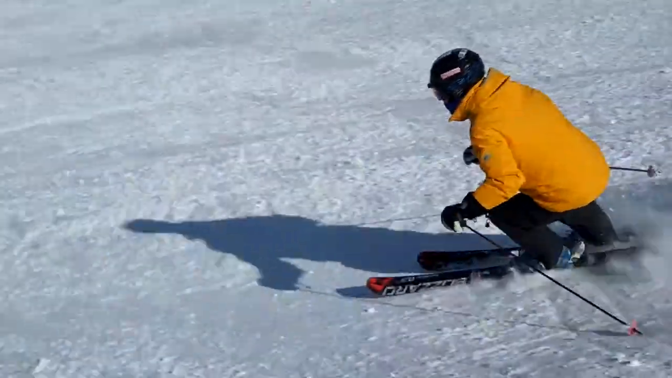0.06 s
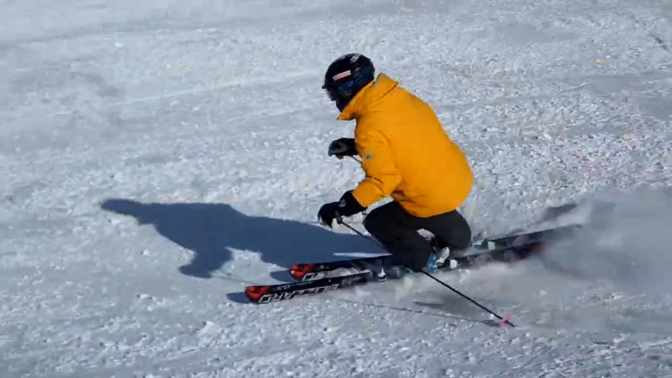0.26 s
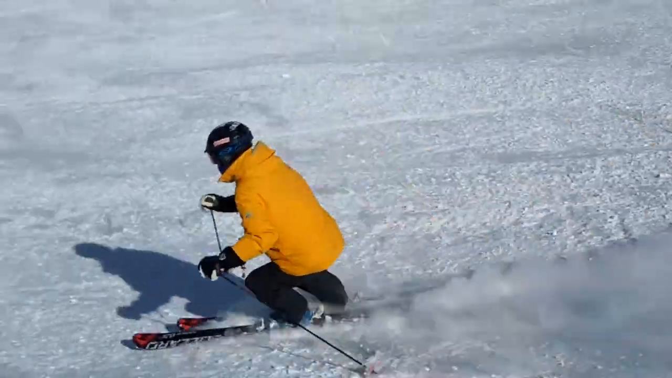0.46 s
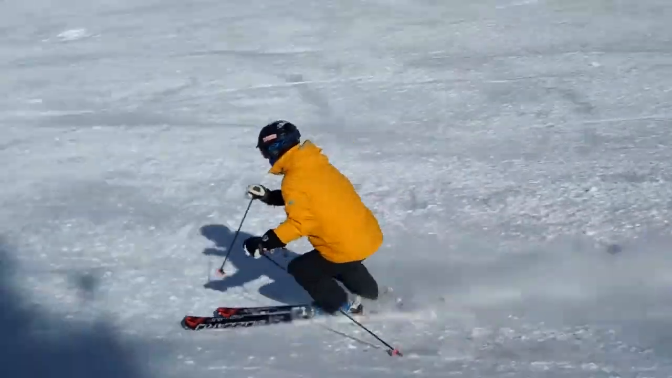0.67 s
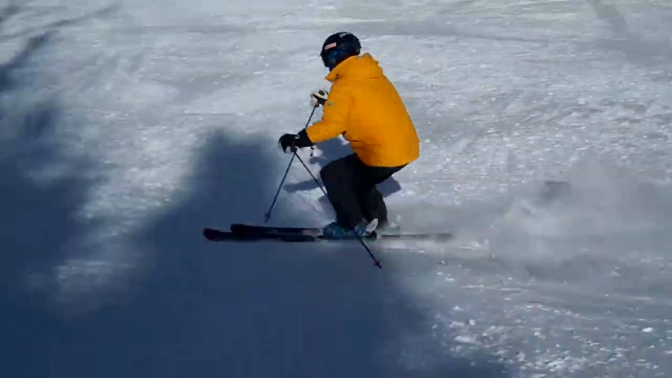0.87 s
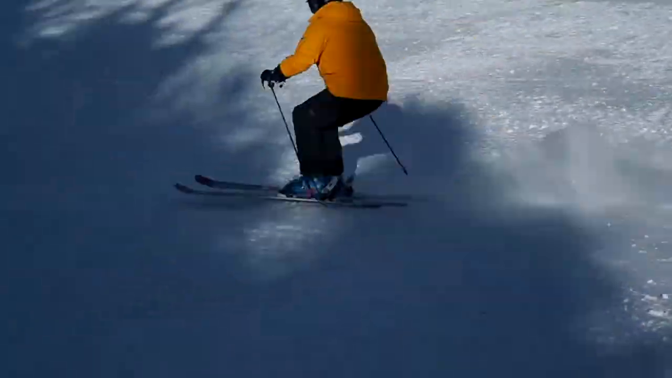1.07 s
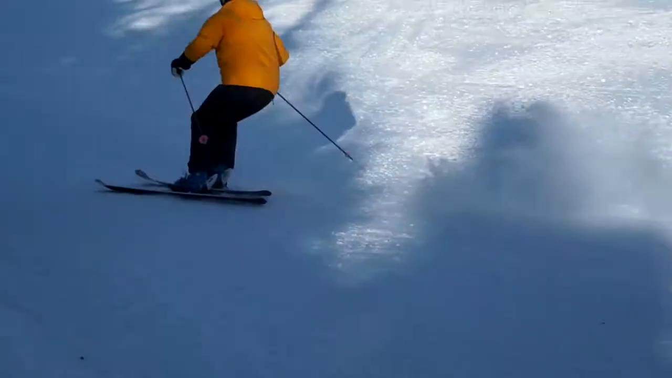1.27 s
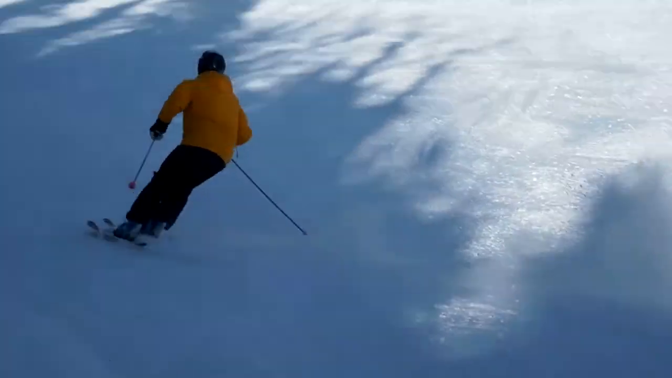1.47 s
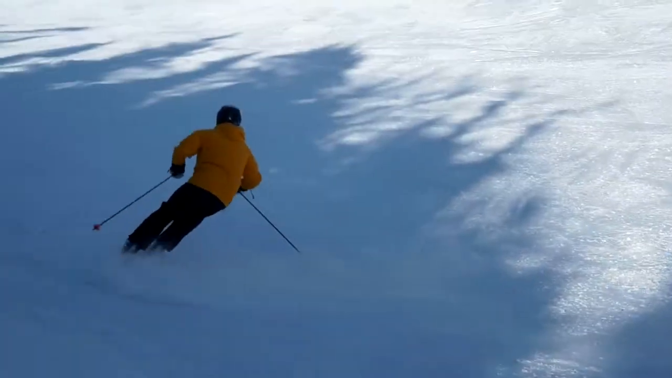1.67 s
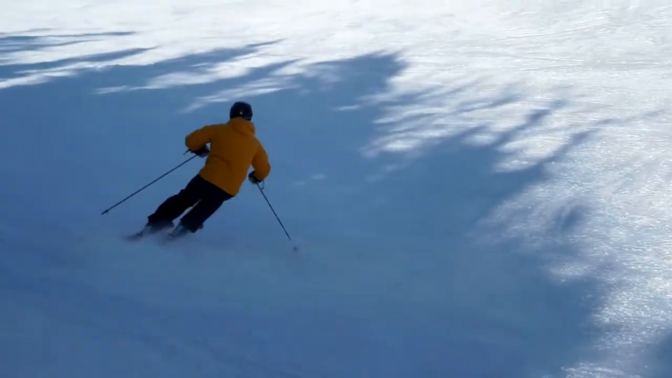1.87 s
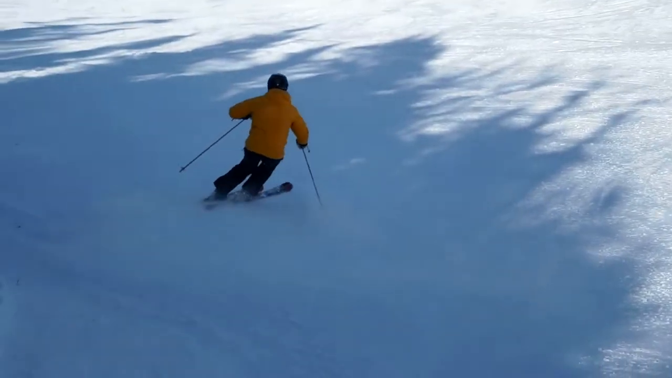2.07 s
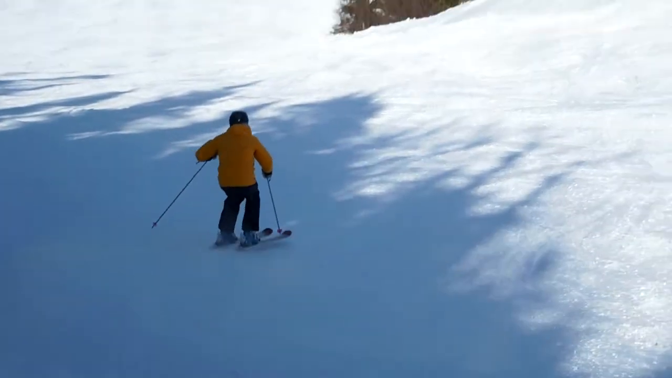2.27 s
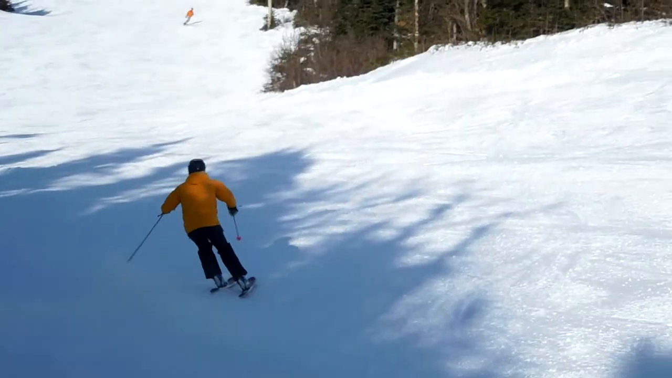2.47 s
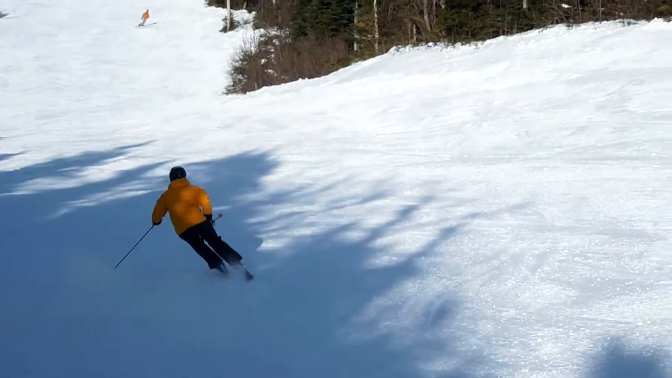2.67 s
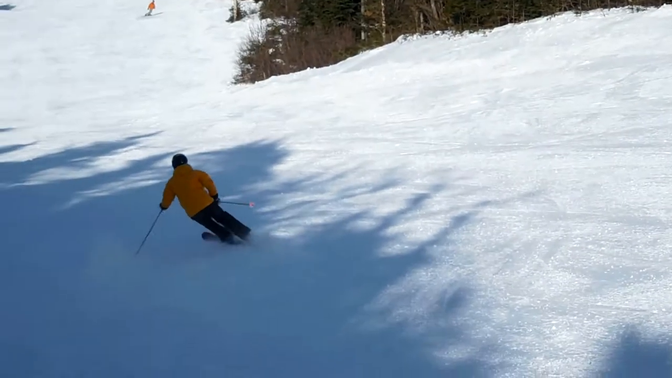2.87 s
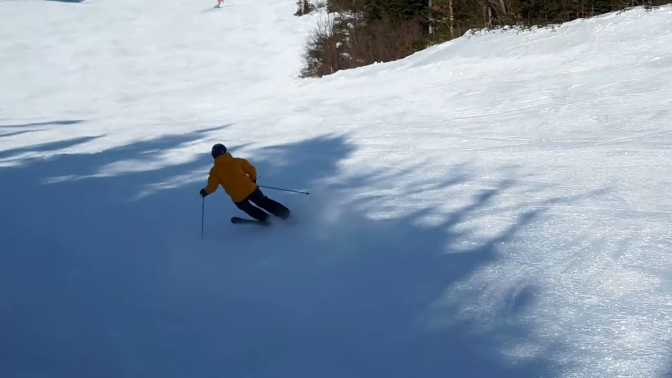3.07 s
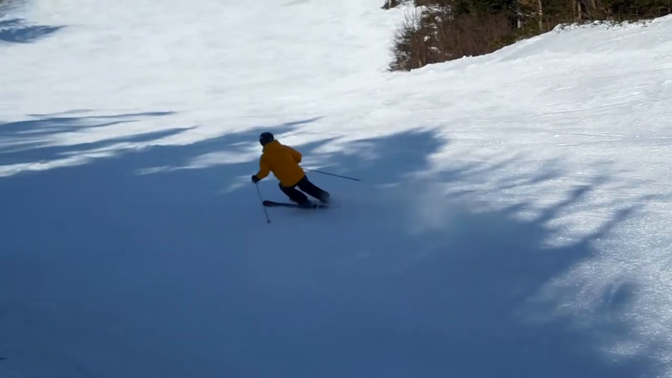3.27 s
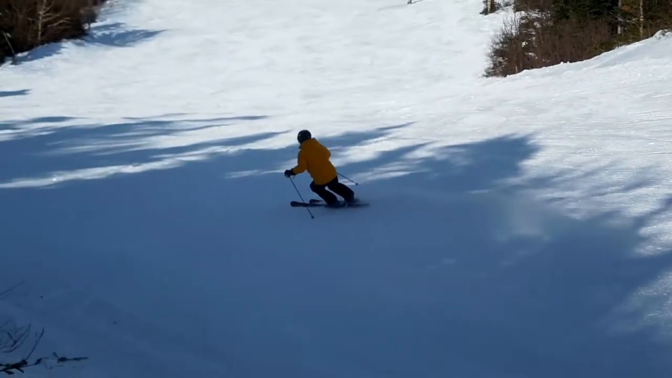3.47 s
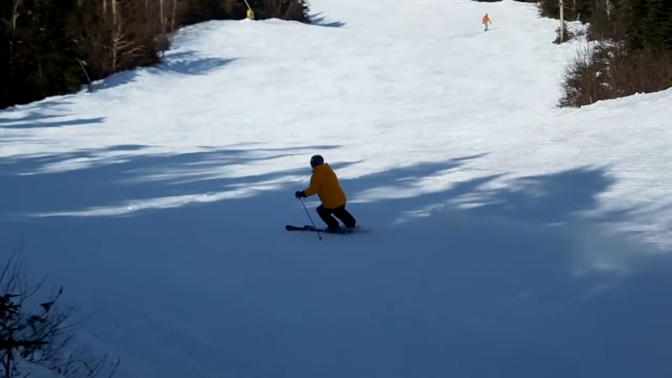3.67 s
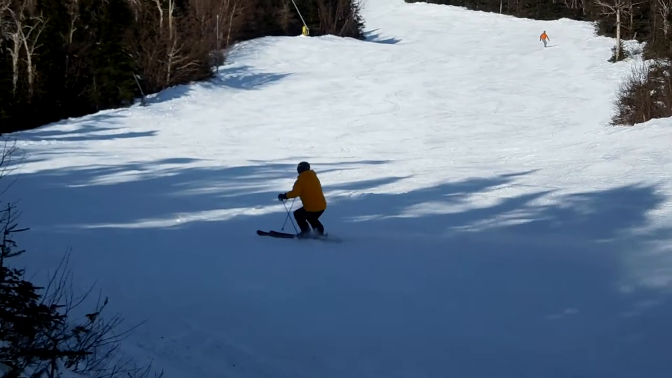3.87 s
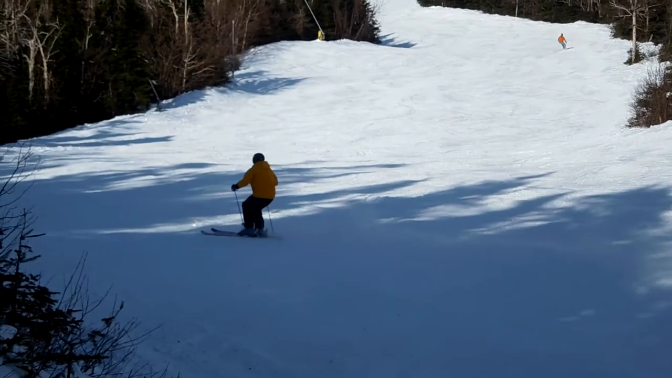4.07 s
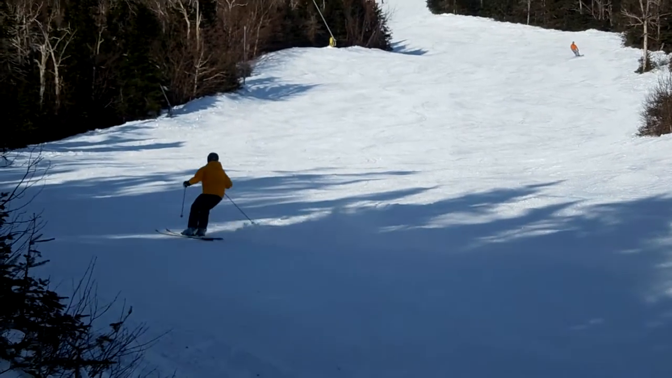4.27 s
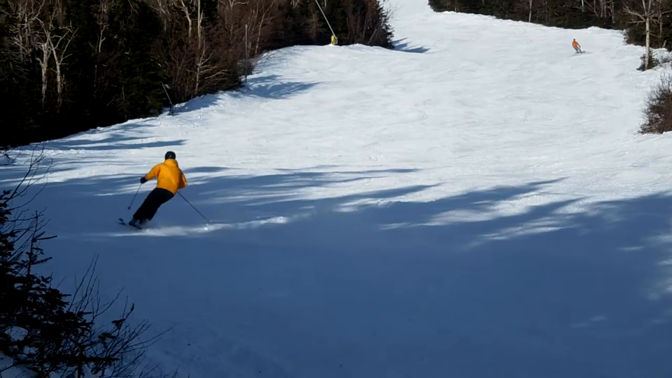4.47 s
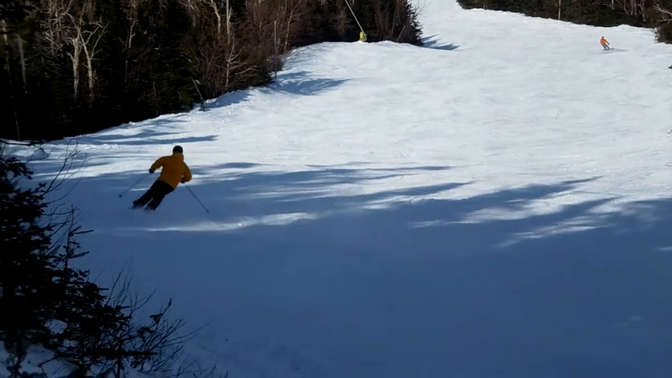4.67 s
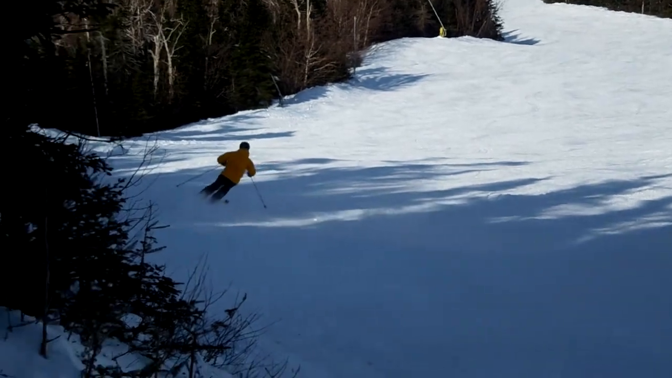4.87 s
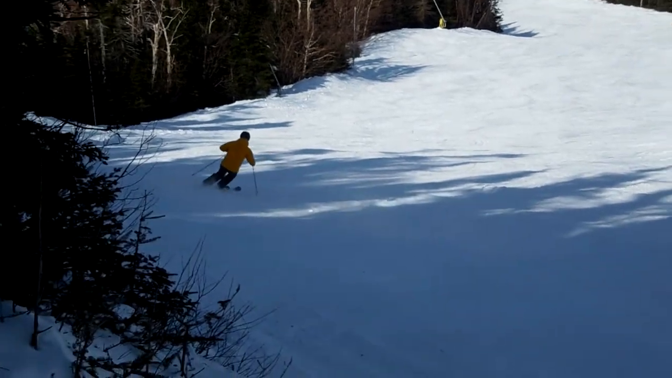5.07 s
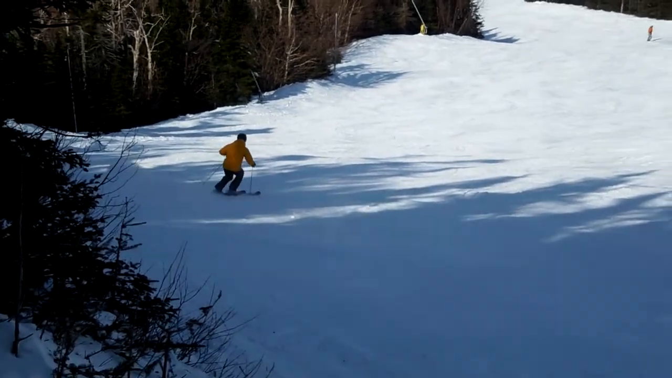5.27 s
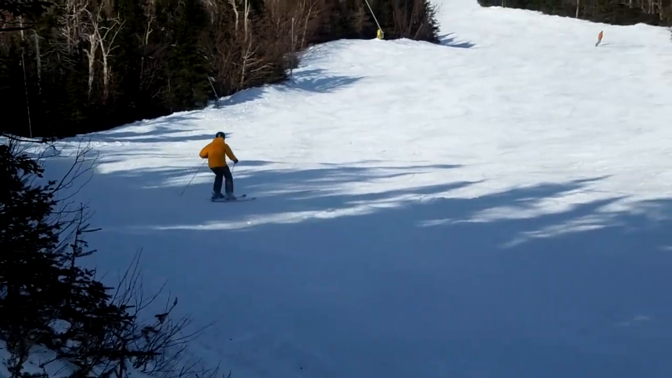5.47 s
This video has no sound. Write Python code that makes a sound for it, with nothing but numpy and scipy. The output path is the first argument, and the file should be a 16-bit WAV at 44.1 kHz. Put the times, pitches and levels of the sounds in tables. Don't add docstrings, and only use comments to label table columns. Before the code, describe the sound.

Outdoors on hard groomed snow, heard through a small stereo camera microphone. From 0 to 1 second skis pass close: a loud, bright, grainy hiss with a rougher scrape and low shudder beneath. Sharp crust snaps and knocks cluster at 0.16-0.5, strongest near 0.19, while low wind puffs bump the microphone, some to one side. A hard flat slap with a short knock hits at 0.71. The hiss drops steeply from 1 to 1.4 as the skier heads off. A softer, duller carve swells around 1.5-2.4, with a knock at 1.57 and faint squeaks at 1.9 and 2.3. It dips near 2.6, swells again around 2.8-3.1 with another squeak, then scrapes and taps lightly at 3.3-3.8. It sinks near 4.3, then weak swishes return around 4.6 and 5.2-5.5, with soft wind pushes, faint drone and electronic hiss.

```python
import sys
import numpy as np
from scipy import signal
from scipy.fft import rfft, irfft, next_fast_len
from scipy.io import wavfile
from scipy.ndimage import uniform_filter1d

SR = 44100
rng = np.random.default_rng(int(sys.argv[2]) if len(sys.argv) > 2 else 0)


def int16_out(signal):
    q = np.round(np.clip(np.atleast_2d(signal).T, -1, 1) * 32767)
    wavfile.write(sys.argv[1], SR, q.astype(np.int16))


def voltage_ratio(level):
    return 10 ** (np.asarray(level, float) / 20)


N = 243167
FAST = next_fast_len(N)


def evened(x):
    return x / np.sqrt(np.mean(abs(x) ** 2) + 1e-20)


def read(points, hz):
    f, value = np.transpose(points)
    return np.interp(np.log(hz + 1), np.log(f + 1), value)


def control(table, column, step=1):
    rows = np.array(table)
    return np.interp(np.arange(N // step + 5) * step / SR, rows[:, 0], rows[:, column])


def add(mix, s, sound):
    part = mix[round(s * SR):][:len(sound)]
    part += sound[:len(part)]


def swells(rows):
    t = np.arange(N) / SR
    return sum(height * np.exp(-((t - s) / max(half, .005)) ** 2) for s, height, half in rows)


def coloured(x, points):
    gain = voltage_ratio(read(points, np.fft.rfftfreq(FAST, 1 / SR)))
    return evened(irfft(rfft(x, FAST) * gain, FAST)[..., :N])


def wander(lo_hz, hi_hz):
    return coloured(rng.standard_normal(N), [(lo_hz / 2, -40), (lo_hz, 0), (hi_hz, -6), (2 * hi_hz, -40)])


# resonance in Hz, sharpness (Q).
PORTS = [(9170, 4.3), (7756, 6.55)]


def ports(hz):
    f, sharp = np.transpose(PORTS)[:, :, None]
    return 1 / (1 - (hz / f) ** 2 + 1j * hz / f / sharp)


# time in seconds, load on the edge in dB, bite into the crust in dB.
CARVE = [(0, -23, -11.5), (.38, -24, -14.5), (.5, -19, -15), (.72, -19, -13.5), (.83, -24.5, -13),
         (1.03, -26, -16.5), (1.28, -39, -10.5), (1.38, -41, -8.5), (1.45, -35, -10), (2.36, -31.5, -2),
         (2.58, -46.5, -4.5), (3.05, -29, -8), (3.33, -40, 0), (4.05, -37, -10), (4.35, -51, -3.5),
         (4.61, -39.5, -8.5), (4.84, -47.5, -3.5), (5.51, -39.5, -1.5)]
# time in seconds, change in dB, half length in seconds.
BUMPS = [(.19, 4.5, 0.068), (.29, 2.5, 0.023), (.35, 3.5, .015), (.4, 4.5, 0.0081), (.62, 0.5, .04),
         (.93, -0.5, .05), (1.14, 0.5, 0.088), (1.24, -1, 0.035), (1.6, 2.5, 0.07), (1.75, -1.5, 0.064),
         (1.92, 2.5, 0.15), (2.06, -1, 0.093), (2.34, 1, .04), (2.43, -1.5, 0.056), (2.5, 0.5, .03),
         (2.68, -1, 0.046), (2.82, 2.5, 0.15), (2.9, -4, 0.048), (3.18, 0.5, .04), (3.32, -1, 0.046),
         (3.42, 3, 0.087), (3.67, -0.5, .05), (3.75, 2, 0.044), (4.13, 0, 0.03), (5.2, 1, 0.084)]


def edge_levels():
    load_db, jolt_db = control(CARVE, column=1)[:N], swells(BUMPS)
    bite_db = load_db + control(CARVE, column=2)[:N] + 1.04 * jolt_db
    shake_db = 0.36 * (load_db + jolt_db + 34)
    return load_db + jolt_db, bite_db, shake_db


def grit(per_s, spread_db):
    size = voltage_ratio(spread_db * np.minimum(rng.exponential(1, N), 5)) * rng.choice([-1., 1.], N)
    return evened(size * (rng.random(N) < per_s / SR))


# time in seconds, distance in metres, delay in ms and strength (0-1) of the echo
# off the camera hand, lateness of the right port in microseconds.
PATH = [
    (0, 6.7, 0.73, 0.024, -17),
    (.75, 6.5, 0.42, 0.023, 1),
    (1.2, 15.4, 0.89, 0.11, -27),
    (1.9, 14.7, .6, 0.11, 11),
    (2.45, 16, .645, .26, -1),
    (2.8, 24, .645, 0.12, 2),
    (3.7, 21, .66, 0.12, -2),
    (4.3, 35, .62, 0.48, -12),
    (5.52, 17, 0.49, 0.55, 0),
]
# time in seconds, shudder level from rough snow in dB, then how hard the edge,
# the tip and the body of the ski ring, each in dB.
SKIS = [(0, -36, -3.5, -5, -2), (.31, -44.5, 1, -1, -3.5), (.62, -39.5, 0.5, -4, 4.5),
        (.87, -40, 0.5, -7, 6), (1.05, -48, 2, -1, 5.5), (1.45, -42, 4, -3.5, -0.5),
        (1.9, -47, -0.5, -0.5, 2), (2.1, -49.5, -1.5, 2, 6.5), (2.33, -46.5, 0.5, 0, 8.5),
        (3.05, -46, -0.5, 2, 3.5), (3.42, -39, 3.5, 2.5, 6.5), (3.95, -42, 0.5, 5.5, 8),
        (4.25, -45.5, 2, -1.5, 4.5), (4.9, -44, 2.5, -8, 1), (5.15, -44.5, 4.5, -1, 4.5),
        (5.52, -46.5, 5.5, 3, 6)]
# ring frequency in Hz, width in Hz.
RINGS = [
    (1900, 1650),
    (740, 150),
    (269, 72),
]


def snow(level_db, near, distant, bump, per_s, spread_db, patchy_db, chatter_db, diffuse, size):
    hop = size // 4
    grains = np.array([grit(per_s, spread_db) for _ in range(3)])
    hz, _, z = signal.stft(grains, SR, nperseg=size, noverlap=size - hop)
    cavity = ports(hz)[:, :, None]
    hz = hz[:, None]
    metres, lag_ms, echo, late_us = (control(PATH, c, step=hop)[:z.shape[2]] for c in range(1, 5))
    ring_db = [control(SKIS, c, step=hop)[:z.shape[2]] for c in range(2, 5)]

    by_pitch = 0.018 + hz ** 4 / (hz ** 4 + 2400 ** 4) + (hz / 17000) ** 3
    scattered = np.clip(diffuse * (0.64 + metres / 45) * by_pitch, 0, .98)

    lag = hz * lag_ms / 1000 * np.array([1, 1.12])[:, None, None]
    strength = echo / (1 + (hz / 7000) ** 2) * np.array([1, .4])[:, None, None]
    comb = 1 + np.exp(-2j * np.pi * (lag - .21)) * strength
    comb[1] *= np.exp(-2j * np.pi * hz * late_us / 10 ** 6)

    far = np.clip((metres - 5) / 12, 0, 1)
    air_db = 0.0014 * metres * (hz / 1000) ** 2
    shape_db = (1 - far) * read(near, hz) + far * read(distant, hz) - air_db
    for db, (f, width) in zip(ring_db, RINGS):
        shape_db = shape_db + db * np.exp(-((hz - f) / width) ** 2)
    shape = voltage_ratio(shape_db)
    shape = shape / np.sqrt(np.mean(abs(shape * comb * cavity) ** 2, (0, 1)))

    patches = rng.standard_normal(z.shape[1:])
    patches = evened(uniform_filter1d(uniform_filter1d(patches, 3, 0), 24, 1))
    direct = np.sqrt(1 - scattered ** 2) * z[0] * comb
    z = (direct + scattered * z[1:]) * shape * voltage_ratio(patchy_db * patches)
    sound = signal.istft(z, nperseg=size, noverlap=size - hop)[1][:, :N]
    return sound * voltage_ratio(level_db[:N] + chatter_db * bump)


# frequency in Hz, density in dB per Hz.
SPRAY_NEAR = [(2500, -20), (4200, -4), (5500, -4), (6200, -3.5), (6750, -1.5), (7250, 2), (7750, -5),
              (8400, -2), (9400, -2), (10500, 0), (12000, -3.5), (14000, 2), (15700, -4)]
SPRAY_FAR = [(2500, -17.5), (4200, -9), (5500, -6.5), (6800, -8), (7700, -8.5), (10000, -8.5),
             (11000, -8.5), (12500, -8.5), (15500, -26)]


def spray(level_db, bump):
    return snow(level_db, SPRAY_NEAR, SPRAY_FAR, bump, per_s=14000, spread_db=2.5,
                patchy_db=1.5, chatter_db=0.68, diffuse=0.51, size=256)


# frequency in Hz, density in dB per Hz.
SCRAPE = [(700, -10), (1150, -5), (1500, -2.5), (2050, -2), (2600, -2.5), (3150, -2), (3900, -4),
          (4700, -10), (6500, -14), (9000, -54)]


def scrape(level_db, bump):
    return snow(level_db, SCRAPE, SCRAPE, bump, per_s=7000, spread_db=2.0,
                patchy_db=1.5, chatter_db=0.9, diffuse=0.8, size=256)


# frequency in Hz, density in dB per Hz.
SHUDDER_NEAR = [(70, -23), (130, 2), (260, -2), (450, -3), (700, -1), (1000, -13.5), (1900, -36)]
SHUDDER_FAR = [(70, -46), (130, 2), (260, -4.5), (500, -4), (750, -2.5), (1150, -8.5), (1900, -27)]


def shudder(shake_db):
    level_db = control(SKIS, column=1)[:N] + shake_db
    return snow(level_db, SHUDDER_NEAR, SHUDDER_FAR, wander(5.9, 22.0), per_s=2500, spread_db=1.5,
                patchy_db=2.5, chatter_db=1.0, diffuse=0.12, size=1024)


def splinters(rows, spread):
    out, t, hz = np.zeros(N), np.arange(2048) / SR, np.fft.rfftfreq(2048, 1 / SR)
    for s, db, centre_hz, t60 in rows:
        decay_s = max(t60, .002)
        tick = 0.12 / decay_s * (t == 0)
        burst = (rng.standard_normal(2048) + tick) * voltage_ratio(-60 * t / decay_s)
        band = np.exp(-((hz / centre_hz - 1) / spread) ** 2)
        splinter = irfft(rfft(np.roll(burst, 40)) * band)
        add(out, s, voltage_ratio(db) * splinter / abs(splinter).max())
    return out


# start in seconds, peak in dB, centre in Hz, 60 dB decay in seconds.
CRACKS = [(.160, -19, 6500, .04), (.188, -10.5, 7650, 0.038), (.1905, -8, 7700, 0.0095),
          (.192, -7, 7440, 0.0061), (.206, -27, 7050, .09), (.264, -19.5, 7600, .033),
          (.339, -22, 6600, .03), (.398, -23, 5970, 0.034), (.578, -20, 6500, 0.16),
          (.7112, -17, 3070, .012), (1.5615, -21, 6740, 0.01), (1.710, -22, 5200, .0087),
          (1.803, -16, 5160, 0.0035), (3.175, -28, 2700, .033), (3.7405, -25, 5500, .013),
          (3.751, -31, 5500, .01), (3.757, -28, 6000, .013), (3.793, -25, 4200, 0.0081),
          (4.6796, -24, 4900, 0.011), (4.94, -35, 6000, .013)]


def cracks():
    return splinters(CRACKS, spread=0.41)


# start in seconds, peak in dB, centre in Hz, 60 dB decay in seconds.
SQUEAKS = [
    (1.89, -29.5, 3180, 0.25),
    (2.33, -28.5, 2300, 0.1),
    (3.003, -32, 2900, .22),
    (5.1, -39.5, 2330, .2),
    (4.173, -37, 3500, .01),
]


def squeaks():
    return splinters(SQUEAKS, spread=0.11)


# start in seconds, level in dB.
SLAPS = [(.191, -20), (.276, -20), (.284, -22), (.397, -24), (.4345, -29), (.528, -26), (0.7106, -7.5),
         (.858, -39), (1.971, -26), (3.342, -28), (3.443, -37), (4.1803, -26)]
# start in seconds, frequency in Hz, level in dB.
TAPS = [
    (.083, 300, -20),
    (.111, 237, -20),
    (0.355, 1510, -23),
    (1.5765, 724, -23.5),
    (1.971, 740, -36),
    (3.29, 240, -26),
    (3.342, 250, -25),
    (3.476, 1030, -24),
    (4.1803, 1640, -30.5),
]
# start in seconds, low and high mode in Hz,
# low and high mode level in dB.
KNOCKS = [(0.16, 310, 767, -15.5, -19.5), (.191, 388, 2000, -29, -15), (.276, 630, 980, -24, -29),
          (0.285, 410, 710, -21, -34), (.397, 375, 710, -24, -30), (.4345, 590, 1720, -21.5, -28),
          (.528, 523, 780, -22, -26), (.7107, 500, 904, -14, -19), (.858, 514, 1080, -26, -30),
          (1.199, 423, 705, -32, -36), (1.272, 477, 1210, -29, -31), (1.571, 625, 1280, -20.5, -21.5),
          (2.109, 820, 550, -24, -34), (3.39, 209, 950, -28, -31), (3.444, 226, 120, -37, -35),
          (3.7581, 1140, 1380, -24.5, -32)]


def knocks():
    out, t = np.zeros(N), np.arange(3000) / SR
    push = np.exp(-((t - .0005) / .00017) ** 2)
    rebound = .6 * np.exp(-((t - .00105) / .0003) ** 2)
    for s, db in SLAPS:
        add(out, s, voltage_ratio(db) * (push - rebound))

    modes = [(s, hz, db, 0.016 + 4.3 / hz) for s, hz, db in TAPS]
    for s, low_hz, high_hz, low_db, high_db in KNOCKS:
        modes.append((s, low_hz, low_db, 0.016 + 4.3 / low_hz))
        modes.append((s, high_hz, high_db, 0.021 + 7.4 / high_hz))
    for s, hz, db, t60 in modes:
        onset = np.minimum(t / 0.0006, 1)
        add(out, s, voltage_ratio(db - 60 * t / t60) * np.sin(2 * np.pi * hz * t) * onset)
    return out


# frequency in Hz, density in dB per Hz.
WIND = [(10, -24), (18, 5.5), (30, 2), (48, -1.5), (75, -2.5), (120, -21.5), (200, -37), (400, -86)]
# time in seconds, level in dB, half length in seconds.
BREEZE = [(0, -33.5, 0.072), (0.177, -30.5, 0.079), (0.397, -29, 0.04), (0.546, -35, 0.074),
          (0.827, -37, 0.052), (1.0, -38, 0.14), (1.4, -56, 0.11), (2.04, -55, 0.056), (2.228, -47, 0.049),
          (2.393, -60, 0.025), (2.6, -62, 0.054), (3.114, -57, 0.029), (3.397, -48, .045),
          (3.877, -50, 0.03), (4.22, -48, 0.041), (4.563, -52, .06), (4.776, -39, 0.033),
          (5.153, -45, 0.083)]
# start in seconds, peak in dB, frequency in Hz, left over right in dB.
GUSTS = [
    (0.208, -22, 50.3, -21),
    (0.25, -21.5, 88, -16),
    (0.389, -18, 106, 8),
    (0.418, -28.5, 73.4, 19),
    (4.767, -33, 39, 1),
    (5.138, -28, 37.5, 1),
]


def wind():
    shared, left, right = coloured(rng.standard_normal((3, N)), WIND)
    mixed = .62 * shared + .78 * np.array([left, right])
    calm_db = -51
    puffs = swells([(s, voltage_ratio(db), half) for s, db, half in BREEZE])
    out = mixed * voltage_ratio(.7 * wander(3.0, 14.0)) * (voltage_ratio(calm_db) + puffs)

    for s, db, hz, pan_db in GUSTS:
        length = 1.4 * SR / hz
        turn = np.arange(round(length)) / length
        lump = voltage_ratio(db - 4.0) * np.sin(2 * np.pi * 1.32 * turn) * np.sin(np.pi * turn)
        add(out[0], s, lump * voltage_ratio(pan_db / 2))
        add(out[1], s, lump * voltage_ratio(-pan_db / 2))
    return out


def hum():
    hz, width, db = 104, 8, -53
    band = [(hz - 2 * width, -40), (hz - width, -9), (hz, 0), (hz + width, -9), (hz + 2 * width, -40)]
    return voltage_ratio(db) * coloured(rng.standard_normal(N), band)


# frequency in Hz, density in dB per Hz.
HISS = [(60, 0.5), (300, -34), (1000, -11.5), (3000, -10), (9000, -11), (13400, -8), (13900, -9),
        (15700, -8.5)]


def hiss():
    return voltage_ratio(-44.5) * coloured(rng.standard_normal((2, N)), HISS)


def scene():
    bump = wander(20.0, 64.0)
    spray_db, bite_db, shake_db = edge_levels()
    skiing = spray(spray_db, bump) + scrape(bite_db, bump) + shudder(shake_db)
    return skiing + cracks() + squeaks() + knocks() + wind() + hum()


def top_cut(x):
    return signal.sosfilt(signal.butter(12, 15700, fs=SR, output="sos"), x)


def record(dry):
    heard = irfft(rfft(dry, FAST) * ports(np.fft.rfftfreq(FAST, 1 / SR)), FAST)[:, :N]
    heard = heard + hiss()
    knee, room = .7, .25
    over = np.maximum(abs(heard) - knee, 0)
    held = heard - np.sign(heard) * (over - room * np.tanh(over / room))
    return top_cut(held)


dry = scene()
out = record(dry)
int16_out(out)
```